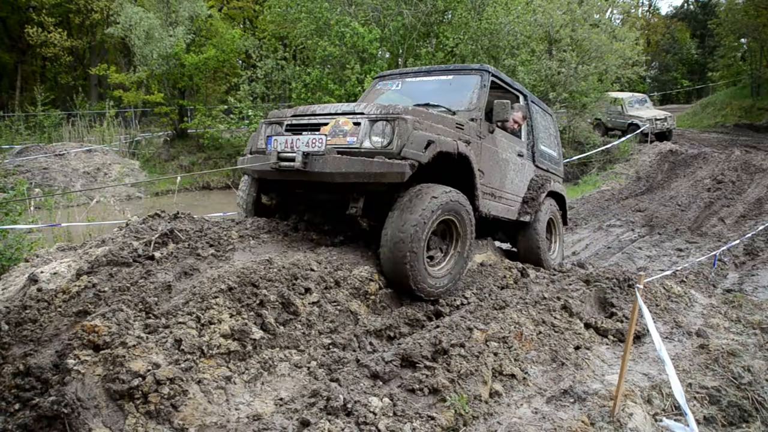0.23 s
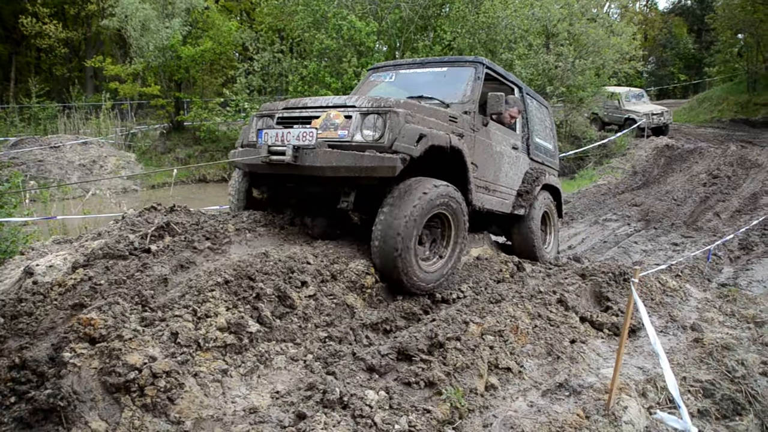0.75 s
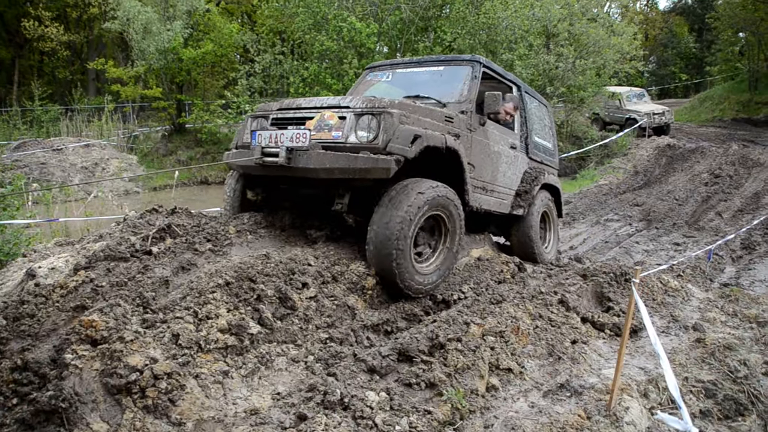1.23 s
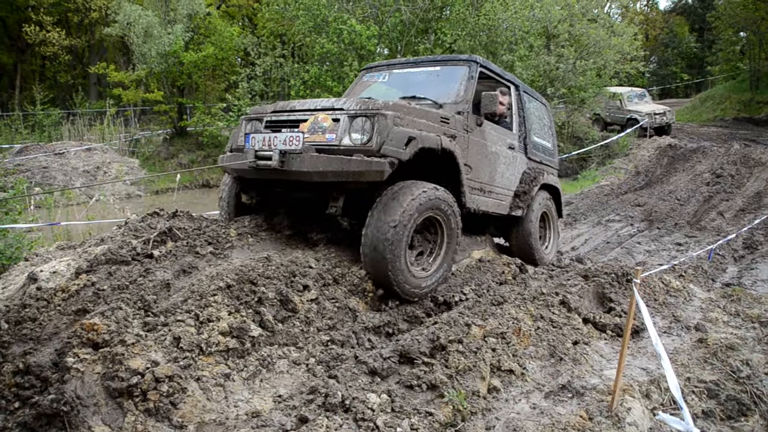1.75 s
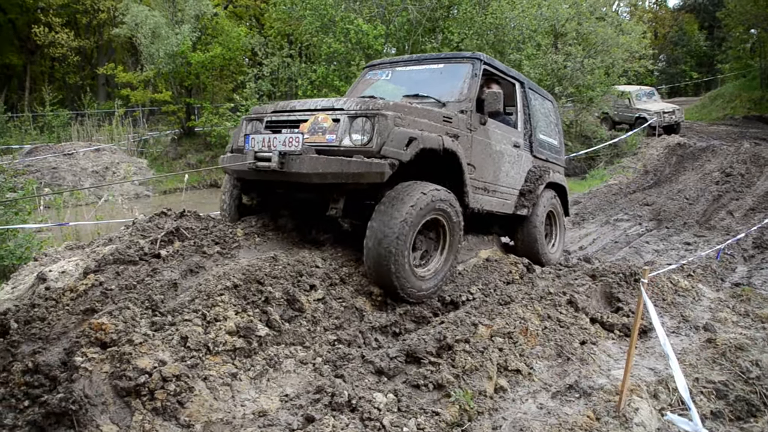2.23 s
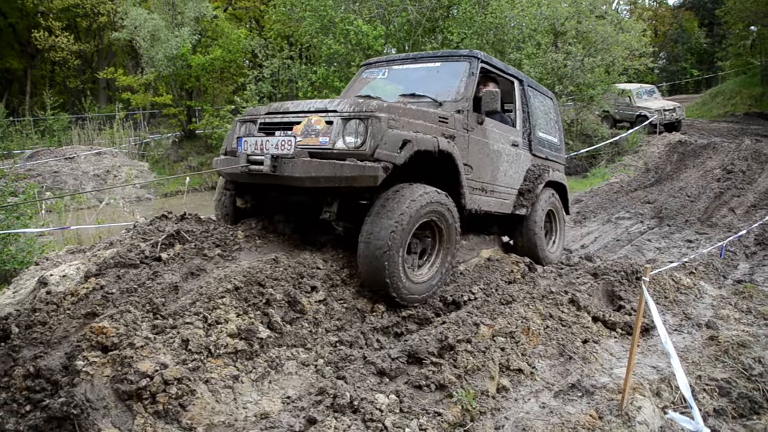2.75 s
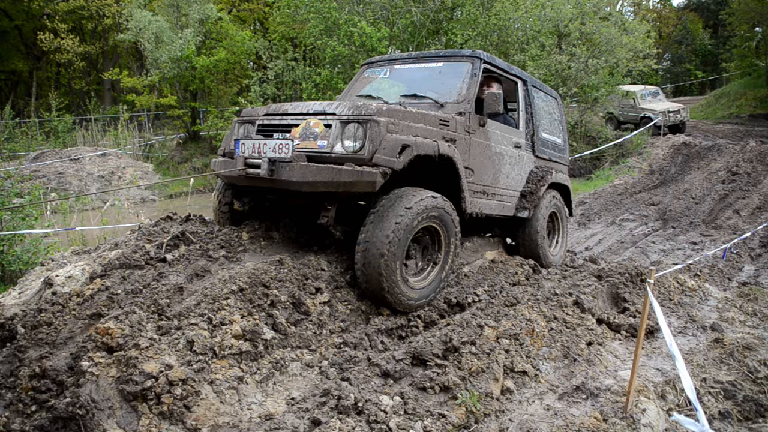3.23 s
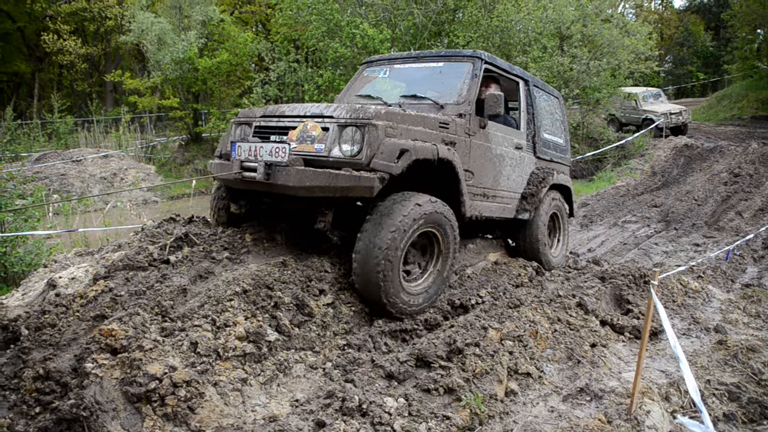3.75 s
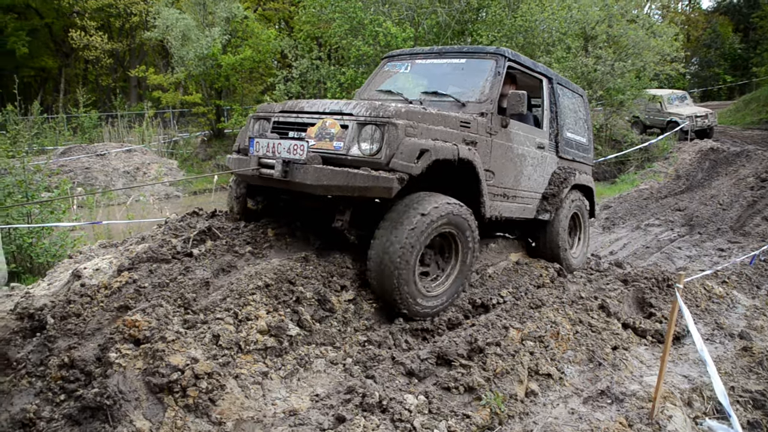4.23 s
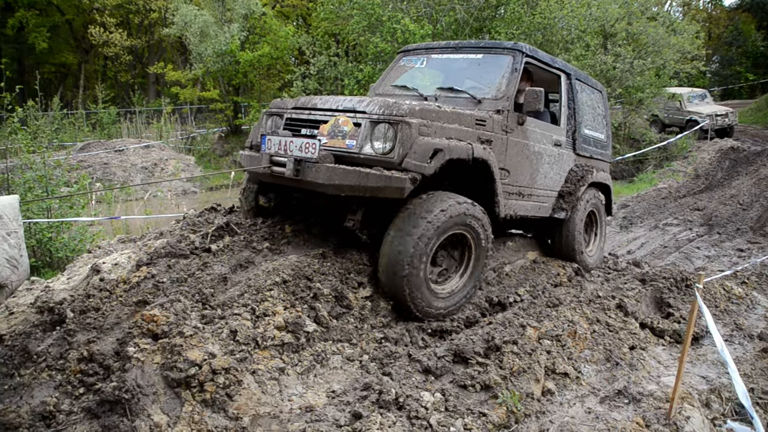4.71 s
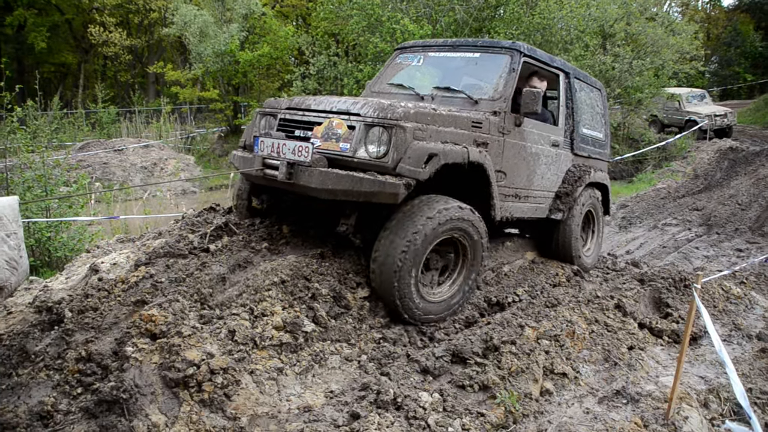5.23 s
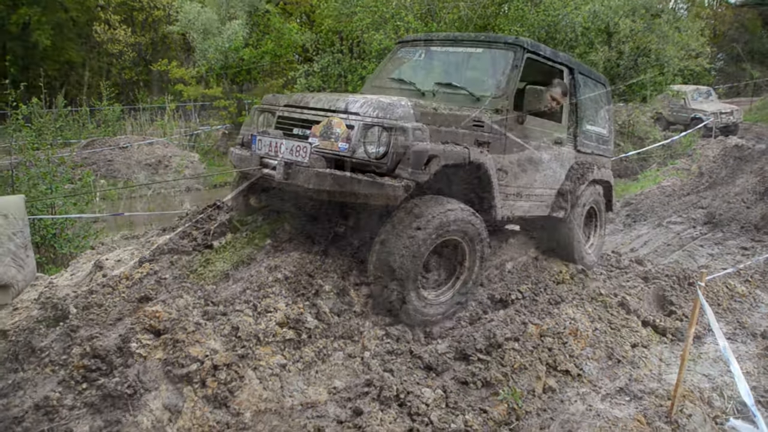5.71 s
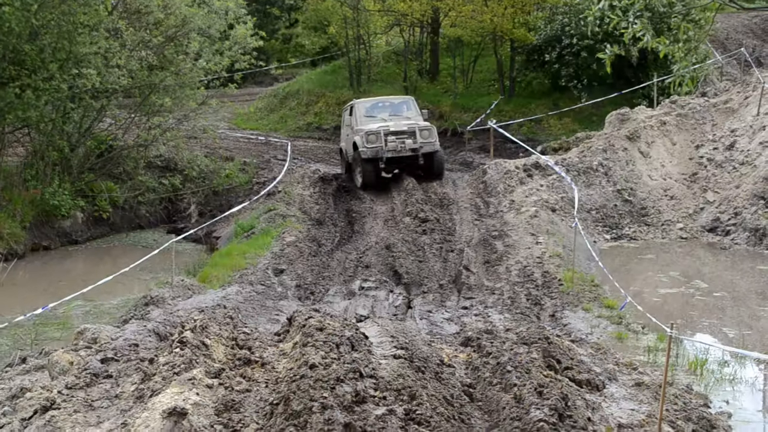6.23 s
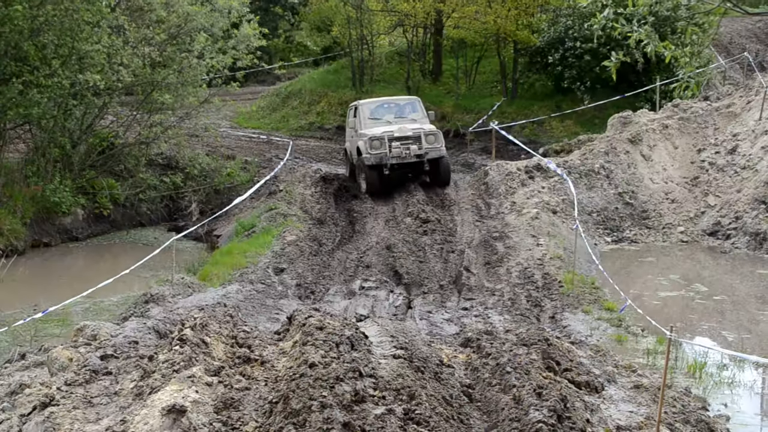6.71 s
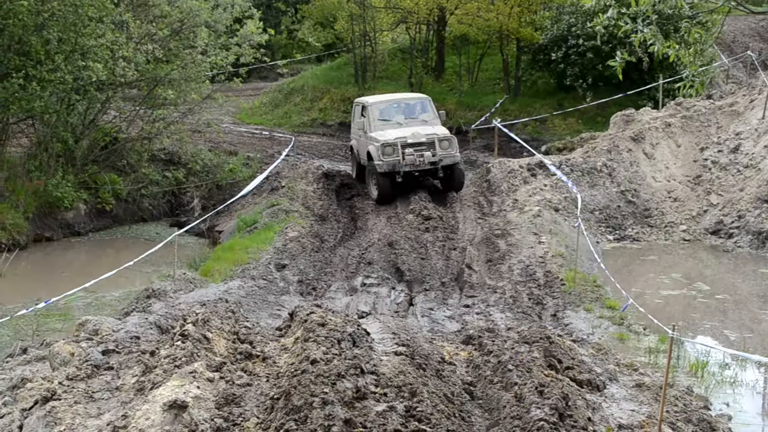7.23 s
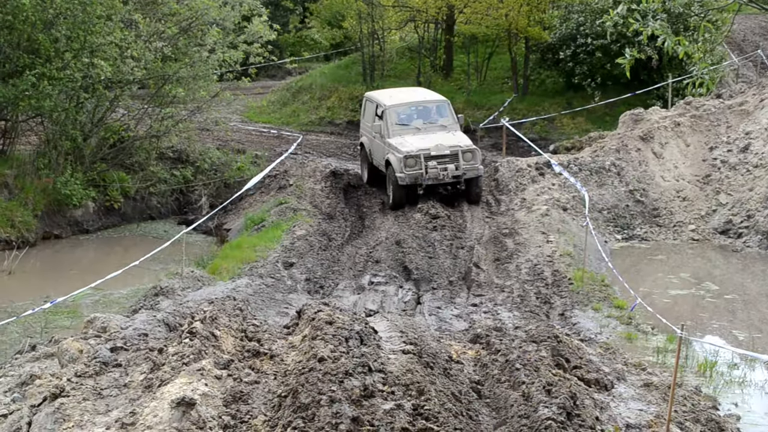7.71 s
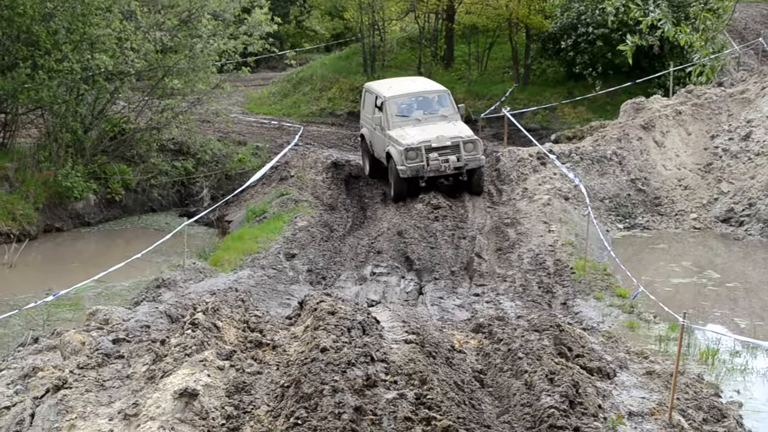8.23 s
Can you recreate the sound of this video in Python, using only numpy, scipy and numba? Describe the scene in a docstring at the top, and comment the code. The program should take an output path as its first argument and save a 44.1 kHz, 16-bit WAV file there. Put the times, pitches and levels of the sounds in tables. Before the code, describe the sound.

Close off-road vehicle crawling with a rasping, rattling engine and metallic knocks, followed by another blipping its throttle farther away.

```python
"""A small four-cylinder 4x4 crawls over a mud mound a few metres away. Its firings drone in the exhaust,
gas rasps and the valve train rattles; as it pulls, the twisting chassis clicks and knocks and thin whines
come and go. It eases off, holds its revs and clunks twice more. Near 6 s the scene dissolves to a second
4x4 further down the track, blipping its throttle while another engine revs once and sinks to idle."""
import sys
import numpy as np
from scipy import signal
from scipy.fft import rfft, irfft, next_fast_len
from scipy.io import wavfile
from scipy.ndimage import uniform_filter1d
from numba import njit

SR = 44100
rng = np.random.default_rng(int(sys.argv[2]) if len(sys.argv) > 2 else 0)


def inscribe(sig):
    """Save sig as 16-bit PCM at rate SR to the path in sys.argv[1].

    A 1-D sig is mono; a 2-D sig holds one channel per row.
    Samples are clipped to [-1, 1] before scaling.
    """
    pcm = np.round(np.clip(np.atleast_2d(sig).T, -1, 1) * 32767)
    wavfile.write(sys.argv[1], SR, pcm.astype(np.int16))


N = 373527
TIME = np.arange(N) / SR

# the four uneven firings of a four-stroke cycle: lateness_cycles, strength_db
CYLINDER_FIRINGS = [(0.0013, 0.5), (0.0171, -3), (-0.0065, -0.5), (0.0063, -3.5)]


def undb(db):
    """Amplitude ratio of a level in decibels."""
    return 10 ** (np.asarray(db) / 20)


def unit(x):
    """Normalisation to rms 1."""
    return x / np.sqrt(np.mean(x ** 2))


def curves(table):
    """Smoothed linear interpolation of each column against the first, time_s."""
    times_s, *columns = np.transpose(table)
    return [uniform_filter1d(np.interp(TIME, times_s, column), size=1500) for column in columns]


def walk(rate_hz):
    """Low-pass random modulation: random steps at rate_hz, smoothed twice; spread near 1."""
    hold = max(int(SR / rate_hz), 2)
    steps = np.repeat(rng.standard_normal(N // hold + 1), hold)
    return 1.3 * uniform_filter1d(uniform_filter1d(steps, hold), hold)[:N]


def colour(x, points):
    """Minimum-phase filtering by a response given as frequency_hz, gain_db."""
    size = next_fast_len(len(x) + 4096, True)
    size += size % 2
    hz, db = np.transpose(points)
    bin_hz = np.arange(size // 2 + 1) * SR / size
    gain_db = np.interp(np.log(bin_hz + 1), np.log(hz), db)
    cepstrum = irfft(np.log(undb(gain_db)))
    cepstrum[1:size // 2] *= 2  # folding the cepstrum makes the filter causal
    cepstrum[size // 2 + 1:] = 0
    return irfft(rfft(x, size) * np.exp(rfft(cepstrum)), size)[:len(x)]


def exhaust(cycle, load, flutter_db=.06, dispersion=.006):
    """Harmonic series: uneven firings repeat each cycle, giving a steady boom and a rougher growl above."""
    # exhaust harmonics, by multiple of the cycle rate: loaded_db, eased_db
    harmonics = {2: (-32.5, -34), 3: (-43, -45), 4: (-20.5, -20.5), 5: (-55, -38.5), 6: (-34, -59),
                 7: (-40, -47), 8: (-38, -28), 9: (-42, -58), 10: (-20.5, -26), 11: (-46, -32),
                 12: (-37, -25.5), 13: (-43, -39), 14: (-31.5, -38), 15: (-49, -30), 16: (-26.5, -28.5),
                 17: (-31, -29.5), 18: (-31.5, -35.5), 19: (-31.5, -32), 20: (-52, -49), 21: (-50, -39.5),
                 22: (-37, -30.5), 23: (-36, -31.5), 24: (-59, -33), 25: (-57, -43), 28: (-35.5, -48),
                 30: (-31, -67), 31: (-64, -36.5), 40: (-37, -56), 43: (-38, -38.5), 51: (-32.5, -36)}
    lateness, strength_db = np.transpose(CYLINDER_FIRINGS)
    moments = np.arange(len(lateness)) / len(lateness) + lateness
    uneven_cycle = cycle + .0014 * walk(90)
    boom, growl = 0, 0
    for order, (loaded_db, eased_db) in harmonics.items():
        firing_phase = np.angle(np.sum(undb(strength_db) * np.exp(-2j * np.pi * order * moments)))
        phase = firing_phase - dispersion * order ** 2  # the silencer delays the higher harmonics
        blur = .0006 * order ** 2 * walk(3 * order)  # pipe turbulence blurs them most
        amplitude = load * undb(loaded_db) + (1 - load) * undb(eased_db)
        harmonic = -amplitude * np.cos(2 * np.pi * order * uneven_cycle + phase + blur)
        if order < 2 * len(CYLINDER_FIRINGS):
            boom += harmonic
        else:
            growl += harmonic * undb(flutter_db * order * walk(9))
    boom_db = -18.5 + load + .69 * walk(60)
    growl_db = -16 - .5 * load + walk(110)
    return unit(boom) * undb(boom_db) + unit(growl) * undb(growl_db)


def gas_puffs(cycle, decay_cycles=.15):
    """Pulsating flow: each firing adds an exponentially decaying puff to a steady stream."""
    flow = .33
    for k, (lateness, strength_db) in enumerate(CYLINDER_FIRINGS):
        age_cycles = (cycle - k / len(CYLINDER_FIRINGS) - lateness) % 1
        flow += undb(strength_db) * np.exp(-age_cycles / decay_cycles)
    return flow


def gas_rasp(puffs, load, eased_db=-21.5, loaded_db=-20.5):
    """Amplitude-modulated flow noise: the gas rasps in time with the firings."""
    # rasp spectrum: frequency_hz, gain_db
    spectrum = [(25, -30), (55, -16.5), (110, -6.5), (175, -10), (280, -8), (430, 0.5), (560, -1),
                (700, -3.5), (860, -5), (1300, -14.5), (2500, -27), (6000, -58.5)]
    rasp = unit(colour(rng.standard_normal(N) * puffs, spectrum))
    return rasp * undb(eased_db + load * (loaded_db - eased_db))


def intake_roar(puffs, load, loaded_db=-21.5):
    """Resonance: pulsed flow noise, filtered by the intake, grows as the throttle opens."""
    # intake spectrum: frequency_hz, gain_db
    spectrum = [(300, -39), (540, 10), (700, -11), (900, 4), (1120, -23), (1320, 11), (1560, 2.5),
                (1800, 3), (2200, -9), (3000, -6), (4200, -44)]
    return unit(colour(rng.standard_normal(N) * puffs, spectrum)) * load * undb(loaded_db)


def valve_train(cycle, count=18, scatter_db=4, decay_s=.0054):
    """Periodic impacts: each valve or piston tap repeats one noise burst, so the rattle is faintly pitched."""
    t, out = TIME[:SR // 60], 0
    for place in (np.arange(count) + rng.random(count)) / count:
        taps = np.searchsorted(cycle, np.arange(int(cycle[-1]) - 1) + place)
        forces = np.zeros(N)
        forces[taps] = undb(scatter_db * rng.standard_normal(len(taps)))
        burst = rng.standard_normal(len(t)) * np.exp(-t / decay_s) * undb(1.93 * rng.standard_normal())
        out += signal.oaconvolve(forces, burst)[:N]
    return unit(out)


def engine_bay(cycle, wander_db=.5):
    """Source and filter: fan rush and valve rattle, with the microphone's treble dips and peaks."""
    # rush and rattle as coloured by the microphone: frequency_hz, gain_db
    spectrum = [(400, -15.5), (850, 0), (1080, 1.5), (1400, 0.5), (1850, -4), (2150, -8), (3000, -11.5),
                (3800, -12.5), (4700, -33.5), (5400, -27.5), (6300, -27), (7300, -47), (8900, -39.5),
                (11500, -51.5), (15500, -61)]
    # course of the rush and rattle: time_s, level_db
    levels = [(0, -21), (.65, -20), (1.1, -25.5), (1.4, -20), (2.2, -19.5), (2.8, -21.5), (3.5, -21),
              (4.0, -20.5), (5.4, -20)]
    level_db, = curves(levels)
    fan = rng.standard_normal(N) * undb(1.7 * walk(25))
    rattle = undb(1) * valve_train(cycle)
    return unit(colour(fan + rattle, spectrum)) * undb(level_db + wander_db * walk(6))


def near_engine(eased_hz=56.2, pulling_hz=64.5):
    """Four-stroke cycle: two crank turns time every layer; load rises from eased to pulling speed."""
    # crankshaft speed: time_s, rotation_hz
    speeds = [(0.0, 61.4), (0.42, 62.1), (0.8, 65.2), (1.0, 66.0), (1.14, 64.7), (1.31, 60.0), (1.51, 55.9),
              (1.8, 52.9), (2.16, 53.3), (2.55, 54.5), (2.87, 54.6), (3.35, 55.6), (3.82, 55.5),
              (4.01, 55.0), (4.79, 54.9), (5.33, 58.0), (5.74, 59.0), (6.1, 59.0)]
    crank_hz, = curves(speeds)
    load = np.clip((crank_hz - eased_hz) / (pulling_hz - eased_hz), 0, 1)
    cycle = np.cumsum(crank_hz) / SR / 2
    puffs = gas_puffs(cycle)
    return gas_rasp(puffs, load) + intake_roar(puffs, load) + engine_bay(cycle) + exhaust(cycle, load)


def frame_ring(t, detune=.0198):
    """Modal vibration: the steel frame rings as damped sinusoids, slightly detuned at every blow."""
    # frame modes: frequency_hz, level_db, t60_s
    modes = [(430, -17, .09), (632, -3.5, 0.1), (870, -6, 0.22), (1376, -0.5, 0.086), (1576, 0, 0.1),
             (1808, 7, 0.053), (2240, -2, 0.059), (2620, -4, 0.071), (2960, -3.5, 0.062),
             (3240, -13, 0.079), (4145, -12.5, 0.049), (5370, -31, 0.023)]
    ring = 0
    for hz, db, t60_s in modes:
        mode_hz = hz * (1 + detune * rng.standard_normal())
        ring += undb(db) * np.sin(2 * np.pi * mode_hz * t) * undb(-60 * t / t60_s)
    return ring


def chassis_clicks(crack_s=.0029, rattle_s=.0092, climb_end_s=1.6):
    """Impulse excitation: short cracks ring the frame; faint ticks fall at random during the climb."""
    # the louder clicks: start_s, level_db, relative_ring_db
    clicks = [(0.1306, -16.5, 11.5), (0.208, -22, 18.5), (0.2723, -19.5, 16), (0.397, -24, 19.5),
              (0.4192, -29.5, 23), (0.5215, -30.5, 19), (0.623, -22, 13.5), (0.7844, -28.5, 17),
              (0.8244, -28, 18), (0.862, -24, 20), (0.9358, -27, 6), (1.0311, -24.5, 18),
              (1.0435, -22.5, 17), (1.0811, -30, 13), (1.1263, -21, 8), (1.1797, -26, 20),
              (1.3608, -18, 13), (1.4066, -28, 16), (1.6335, -29, 18), (1.6536, -20.5, 18),
              (2.0072, -21, 16), (4.1436, -13.5, 10), (5.528, -21.5, 19.5), (5.5772, -30, 15)]
    # a sharp crack as coloured by the microphone: frequency_hz, gain_db
    spectrum = [(200, -17), (600, 10), (1500, -1), (3200, 15), (4800, -11), (5900, 4.5), (7300, -18),
                (9000, -5.5), (11000, -15), (15500, -27)]
    ticks = [(climb_end_s * rng.random(), -32.5 + 6 * rng.standard_normal(), 13) for _ in range(12)]
    t, out = TIME[:SR // 5], np.zeros(N)
    envelope = np.exp(-t / crack_s) + undb(-14) * np.exp(-t / rattle_s)
    for start_s, level_db, ring_db in clicks + ticks:
        crack = undb(3) * colour(rng.standard_normal(len(t)) * envelope, spectrum)
        ring = undb(ring_db - 14) * frame_ring(t)
        start = int(start_s * SR)
        out[start:start + len(t)] += undb(level_db) * (crack + ring)
    return out


def whines():
    """Frequency and amplitude modulation: thin tones swell, waver, glide and fade."""
    # whines and whistles: start_s, end_s, start_hz, end_hz, level_db
    glides = [(.62, 1.2, 1305, 1315, -28), (2.4, 3.7, 1435, 1400, -38), (2.0, 5.4, 3600, 3620, -51),
              (4.4, 5.35, 5240, 5280, -54.5), (4.2, 5.35, 5780, 5940, -53.5), (4.6, 5.2, 6540, 6580, -58),
              (6.8, 7.18, 870, 695, -36)]
    out = np.zeros(N)
    for start_s, end_s, start_hz, end_hz, level_db in glides:
        progress = np.clip((TIME - start_s) / (end_s - start_s), 0, 1)
        pitch_hz = (start_hz + (end_hz - start_hz) * progress) * (1 + .004 * walk(45))
        swell = np.sin(np.pi * progress) * undb(level_db + 2.5 * walk(20))
        out += swell * np.sqrt(2) * np.sin(2 * np.pi * np.cumsum(pitch_hz) / SR)
    return out


def suspension_clunks(low_hz=550, damped_s=.0018, body_db=-7, body_s=.013, body_top_hz=850):
    """Forced vibration: parts grind briefly and drive the frame, whose low modes swell late and linger."""
    # heavy clunks: start_s, level_db, contact_s, cutoff_hz
    clunks = [(1.180, -12.5, .0013, 2500), (1.654, -20, .002, 2000), (4.145, -4, .0032, 2800),
              (5.528, -7, .0036, 1700)]
    t, out = TIME[:SR // 5], np.zeros(N)
    for start_s, level_db, contact_s, cutoff_hz in clunks:
        grind = rng.standard_normal(len(t)) * t / contact_s * np.exp(-t / contact_s)
        # rubber bushes soften the push, and parts pressed together damp the frame
        push = colour(grind, [(low_hz / 2, -18), (low_hz, 0), (cutoff_hz, 0), (2 * cutoff_hz, -18)])
        knock = signal.fftconvolve(push, frame_ring(t) * np.exp(-t / damped_s))[:len(t)]
        knock /= np.std(knock[:SR // 100])
        body = colour(frame_ring(t) * t * np.exp(-t / body_s), [(body_top_hz, 0), (2 * body_top_hz, -18)])
        body /= np.std(body[:SR // 50])
        start = int(start_s * SR)
        out[start:start + len(t)] += undb(level_db) * (knock + undb(body_db) * body)
    return out


def throttle_bell(peak_s, rise_s, fall_s):
    """Gaussian envelope of a press and release of the throttle, from 0 to 1 and back."""
    return np.exp(-((TIME - peak_s) / np.where(TIME < peak_s, rise_s, fall_s)) ** 2)


def distant_exhaust(firing_hz, partials, wobble, flutter_db):
    """Line spectrum wavering with uneven combustion and the ground path; also returns the firing count."""
    firings = np.cumsum(firing_hz * (1 + wobble * walk(35))) / SR
    tone = 0
    for multiple, level_db in partials:
        amplitude = undb(level_db + flutter_db * walk(12))
        tone += amplitude * np.cos(2 * np.pi * (multiple * firings + rng.random()))
    return unit(tone), firings


def blipping_vehicle(idle_hz=69.22, idle_db=-51, rolling_db=-30):
    """Power addition: each blip lifts exhaust, rattle and tyre noise above idle, and the pitch rises."""
    # throttle blips: peak_s, rise_s, fall_s, firing_hz, exhaust_db, noise_db
    blips = [(6.0, .2, .16, 77.8, -26.5, -27), (6.27, 0.091, .34, 77.9, -31.5, -23),
             (6.85, .17, .19, 79, -25.5, -27.5), (7.5, .14, .12, 77, -40, -55),
             (8.09, .09, .17, 74.3, -31.5, -30.5), (8.42, .2, .2, 84.94, -31.5, -25.5)]
    # exhaust partials: firing_rate_multiple, level_db
    partials = [(1.5, -12), (2, -11), (3, 2), (3.5, -12), (4, -4), (4.5, -11), (5, -9), (6, -13), (7, -12),
                (10, -11), (17, -15)]
    # far engine and tyre noise: frequency_hz, gain_db
    spectrum = [(25, -15), (45, -14), (70, 3.5), (100, 0), (130, 5.5), (185, -2), (320, 1), (450, -2.5),
                (800, 2), (1050, -0.5), (1450, 0), (2100, -7.5), (3000, -15), (3900, -17.5), (4800, -31),
                (8500, -42), (12000, -53), (15500, -53)]
    firing_hz, exhaust_power, noise_power = idle_hz, undb(idle_db) ** 2, undb(rolling_db) ** 2
    for peak_s, rise_s, fall_s, peak_hz, exhaust_db, noise_db in blips:
        throttle = throttle_bell(peak_s, rise_s, fall_s)
        firing_hz += throttle * (peak_hz - idle_hz)
        exhaust_power += (throttle * undb(exhaust_db)) ** 2
        noise_power += (throttle * undb(noise_db)) ** 2
    tone, firings = distant_exhaust(firing_hz, partials, wobble=.009, flutter_db=2)
    throb = 1 + .2 * np.cos(2 * np.pi * firings)
    rattle = undb(-10) * valve_train(firings / len(CYLINDER_FIRINGS), count=8, scatter_db=1.5)
    noise = (rng.standard_normal(N) * throb + rattle) * undb(.51 * walk(30))
    return tone * np.sqrt(exhaust_power) + unit(colour(noise, spectrum)) * np.sqrt(noise_power)


def droning_engine(rev_s=6.46, rev_hz=82.6, rev_db=-23, idle_hz=66.5, idle_db=-42, sag_hz_per_s=2.6):
    """Pitch follows firing rate: one rev lifts the drone and swells it, then the idle slowly sags."""
    # drone partials: firing_rate_multiple, level_db
    partials = [(1, 0), (1.5, -13), (2, -7), (2.5, -18)]
    base_hz = idle_hz - sag_hz_per_s * np.maximum(TIME - rev_s, 0)
    firing_hz = base_hz + throttle_bell(rev_s, rise_s=.32, fall_s=.32) * (rev_hz - base_hz)
    drone, _ = distant_exhaust(firing_hz, partials, wobble=.0178, flutter_db=.5)
    corners_s = np.cumsum([6.1, .16, .35, .42])  # start, attack, hold, release
    swell = np.interp(TIME, corners_s, [0, 1, 1, 0])
    return drone * undb(idle_db + swell * (rev_db - idle_db))


def scene():
    """Superposition: the near vehicle cross-fades into the far ones, with the whines over both."""
    # the cross-fade: time_s, near_db, far_db
    dissolve = [(5.52, -2.5, -40), (5.72, -6, -15), (5.9, -9, -7.5), (6.1, -17, 0.5), (6.25, -14, 0),
                (6.4, -60, 0.5)]
    near_db, far_db = curves(dissolve)
    near = near_engine() + chassis_clicks() + suspension_clunks()
    far = droning_engine() + blipping_vehicle()
    return (near * undb(near_db) + far * undb(far_db) + whines())[None]


@njit
def peak_follower(x, attack_s, release_s):
    """Envelope detection: the rectified signal is smoothed with separate rise and fall times."""
    attack, release = 1 / (1 + attack_s * SR), 1 / (1 + release_s * SR)
    out, level = np.empty(len(x)), 0.
    for i in range(len(x)):
        level += (abs(x[i]) - level) * (attack if abs(x[i]) > level else release)
        out[i] = level
    return out


def record(dry, threshold_db=-6, cutoff_hz=15800):
    """Peak limiting ducks the level after hard knocks; a steep low-pass cuts the highest treble."""
    envelope = peak_follower(dry[0], .00072, .084)  # attack_s, release_s
    limited = dry / np.maximum(1, envelope / undb(threshold_db))
    return signal.sosfilt(signal.ellip(8, .2, 70, cutoff_hz, fs=SR, output="sos"), limited)


dry = scene()
out = record(dry)
inscribe(out)
```